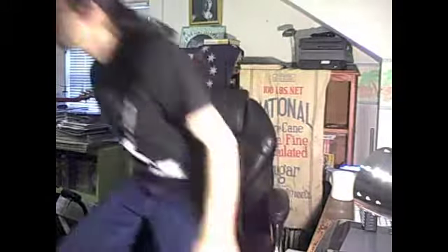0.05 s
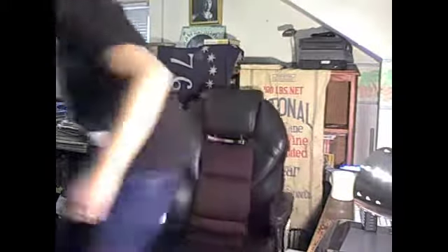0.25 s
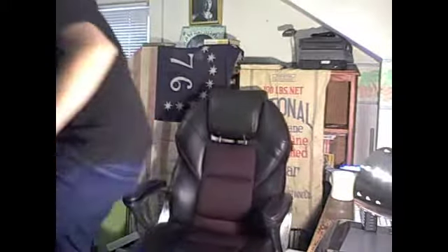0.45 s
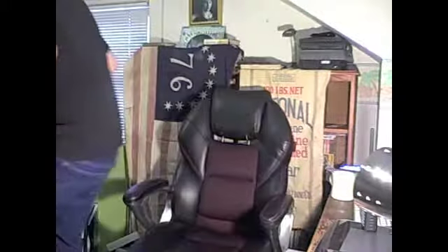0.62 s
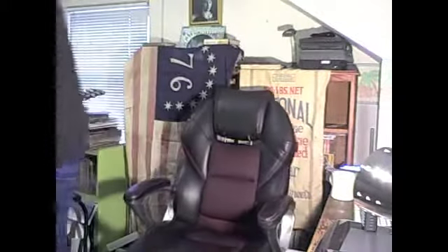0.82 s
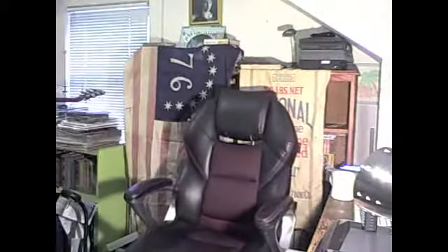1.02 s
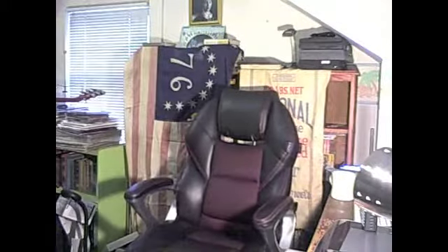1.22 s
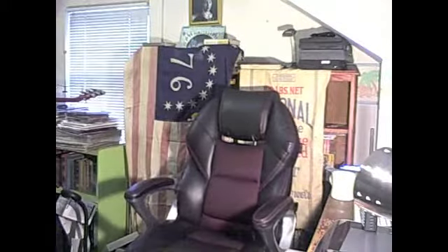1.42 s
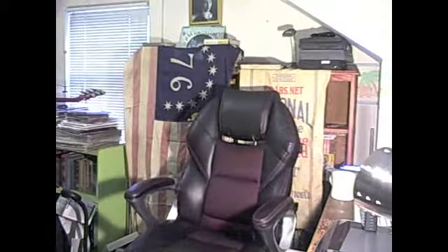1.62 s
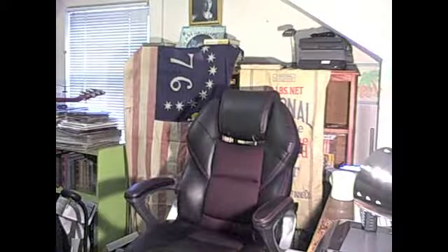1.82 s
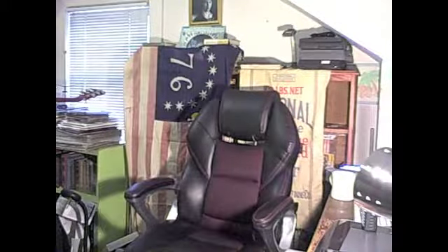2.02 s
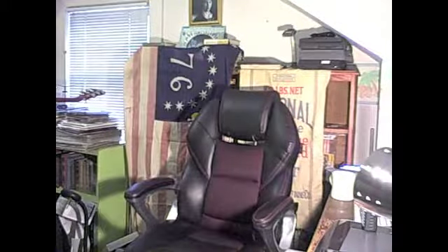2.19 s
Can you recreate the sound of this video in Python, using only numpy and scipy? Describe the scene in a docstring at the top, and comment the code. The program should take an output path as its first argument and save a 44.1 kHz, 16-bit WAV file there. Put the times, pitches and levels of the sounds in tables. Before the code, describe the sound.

Three heavy footsteps thump on a wooden floor as someone gets up from an office chair in a small room. Loose things rattle, and soles and clothes shuffle between steps. The nearby microphone shakes with a low rumble.

```python
"""Three heavy footsteps on a wooden floor, as someone gets up from an office chair in a small cluttered room.
Each heel impact excites the damped modes of the boards. The weight sets the floor and desk swaying,
which rattles loose things and overloads the microphone. Between the steps, soles and clothes make
friction noise, the chair knocks lightly and wood creaks, over a quiet hiss and a faint electrical whine."""
import sys
import numpy as np
from scipy import signal
from scipy.fft import rfft, irfft
from scipy.io import wavfile

SR = 44100
rng = np.random.default_rng(int(sys.argv[2]) if len(sys.argv) > 2 else 0)


def output_pcm(signal):
    """Save a mono or channel-first signal as 16-bit PCM at the path in sys.argv[1].

    Samples are clipped to [-1, 1] before scaling.
    """
    pcm = np.clip(np.atleast_2d(signal).T, -1, 1) * 32767
    wavfile.write(sys.argv[1], SR, np.round(pcm).astype(np.int16))


N = 103635
T = np.arange(N) / SR
HZ = np.maximum(np.arange(N // 2 + 1) * SR / N, 1)

# heel impacts: start_s, level_db, contact_cutoff_hz
HEEL_IMPACTS = [(0.2293, -10, 1310), (0.2354, -13.5, 705), (0.2446, -7, 707), (.9895, -5, 600),
                (.9962, -6, 550), (1.201, -22.5, 490), (1.8698, -7.5, 1080), (1.8768, -6.5, 880),
                (1.891, -12, 1300), (1.921, -15, 604)]
# floorboard modes: pitch_hz, level_db, t60_s
BOARD_MODES = [(88, -22, 0.38), (112.3, -12.5, 0.049), (140.1, -3.5, 0.091), (178.8, -4.5, 0.093),
               (211.7, -7.5, 0.13), (269.6, -22, 0.16), (324.2, -9.5, 0.086), (360.2, -18, 0.31),
               (463.7, -33, 0.11), (504.7, -13, 0.054), (566.3, -30, 0.093), (698, -23.5, 0.22),
               (1034, -27.5, 0.14), (1430, -22, 0.17)]
# spectrum of the sole's slap: frequency_hz, level_db
SLAP_SPECTRUM = [(100, -3.5), (250, -1), (450, 3.5), (800, -6.5), (1250, -14.5), (1600, -8), (2000, -25.5),
                 (2900, -37.5), (3900, -9.5), (4800, -49), (8000, -48.5)]
def heels(slap_db=-24, slap_decay_s=0.031, slap_cutoff_ratio=2.9):
    """Impact excitation: a blow rings the boards and slaps the sole; soft contact limits the treble."""
    out = 0
    for start, db, contact_hz in HEEL_IMPACTS:
        boards = sum(undb(mode_db) * ring(start, hz, t60) for hz, mode_db, t60 in BOARD_MODES)
        thump = lowpass(boards, contact_hz, order=3)
        slap = burst(start, slap_decay_s) * rng.standard_normal(N)
        slap = undb(slap_db) * irfft(rfft(slap) * unit(colour(SLAP_SPECTRUM)), N)
        out += undb(db) * (thump + lowpass(slap, slap_cutoff_ratio * contact_hz))
    return out


# weight landing on the joists: start_s, level_db
JOIST_LOADS = [(0.252, -0.5), (0.997, -6.5), (1.887, -1)]
# desk rocking as the weight shifts: centre_s, level_db, centre_pitch_hz, half_length_s
DESK_ROCKINGS = [(0.278, 5, 21.15, 0.0284), (0.632, -14, 19.8, 0.044), (1.923, 0.5, 16.5, 0.0291),
                 (2.091, -19.5, 22.5, 0.039)]
# desk shudders after a footfall or shove: start_s, level_db, pitch_hz, t60_s
DESK_SHUDDERS = [(0.26, -10, 60.5, 0.47), (0.26, -17, 83.8, 0.29), (1.006, -21.5, 61.7, 0.31),
                 (1.205, -23, 93.8, 0.36), (1.288, -26.5, 178, 0.11), (1.504, -35, 134, 0.35),
                 (1.924, -10.5, 58.6, 0.34), (1.94, -14.5, 89, .2)]
# spectrum of a steady low tremble: frequency_hz, level_db
TREMBLE_SPECTRUM = [(5, -22), (12, -3), (18, -10), (28, -17), (50, -25), (100, -51), (300, -100)]
def floor_and_desk(sway_hz=12.08, sway_t60_s=0.95, rise_s=0.044, sag_hz_per_s=194, tremble_db=-31.5):
    """Structure-borne vibration: loaded joists dip and sway; the desk shakes the microphone on it."""
    out = undb(tremble_db) * noise(colour(TREMBLE_SPECTRUM))
    for start, db in JOIST_LOADS:
        onset = 1 - burst(start, rise_s)
        out -= undb(db) * onset * ring(start, sway_hz, sway_t60_s)
    for centre, db, hz, half_length in DESK_ROCKINGS:
        age = T - centre
        slowing_phase = 2 * np.pi * age * (hz - sag_hz_per_s * age / 2)
        out += undb(db) * gaussian(centre, half_length) * np.sin(slowing_phase)
    shudders = sum(undb(db) * ring(start, hz, t60) for start, db, hz, t60 in DESK_SHUDDERS)
    return lowpass(out - shudders, hz=250)


# knocks of the chair and loose things: start_s, level_db, decay_s, cutoff_hz, ring_hz, ring_db
KNOCKS = [(0.1981, -28, 0.021, 4200, 777, 8.5), (.2455, -17.5, 0.018, 3380, 1050, 4.5),
          (.2475, -9.5, 0.0025, 2920, 1505, 2.5), (0.2536, -8, 0.002, 3000, 2265, -11.5),
          (.281, -44, .008, 2950, 1670, 5), (.298, -43, .015, 3600, 580, 22.5),
          (1.270, -32, 0.018, 8400, 1466, 3), (1.345, -28.5, 0.0076, 2376, 370, -1.5),
          (1.762, -43.5, 0.011, 4000, 1030, 5), (1.892, -17.5, 0.015, 2080, 767, 3),
          (1.9004, -14, 0.0055, 3560, 319.5, 4.5), (1.919, -21, 0.0075, 4530, 3800, -22),
          (1.942, -31, 0.025, 5500, 3930, -7)]
# their broad spectrum: frequency_hz, level_db
KNOCK_SPECTRUM = [(150, -3.5), (350, 8.5), (750, 4), (1250, -11), (1900, -11), (2500, -9.5), (3200, -11.5),
                  (4000, -7), (4800, -15.5), (8000, -21.5)]
# their shared resonances: centre_hz, width_hz, boost_db
KNOCK_RESONANCES = [(820, 210, 1.3), (1035, 27, 16.3), (1423, 350, 9.2), (1624, 130, 19)]
def knocks(ring_t60_s=0.036):
    """Resonance: rattling contacts drive a shared body, and each object rings briefly at its own pitch."""
    peaks_db = sum(resonance_db(hz, width, db) for hz, width, db in KNOCK_RESONANCES)
    body = colour(KNOCK_SPECTRUM) * undb(peaks_db)
    out = 0
    for start, db, decay, cutoff_hz, ring_hz, ring_db in KNOCKS:
        rattle = lowpass(burst(start, decay) * noise(body), cutoff_hz)
        own_ring = undb(ring_db) * ring(start, ring_hz, ring_t60_s)
        out += undb(db) * (rattle + own_ring)
    return out


# strokes of soles and cloth: peak_s, level_db, rise_s, fall_s, tilt_db_per_octave, resonance_hz, boost_db
SCUFFS = [(.08, -41.5, 0.36, 0.24, -3, 187, 7), (.42, -40.5, .05, 0.054, -6, 515, 12),
          (1.114, -46.5, 0.048, 0.036, 3, 1470, 13), (1.208, -30, 0.025, .028, -3.5, 300, 7.5),
          (1.371, -34.5, 0.041, 0.026, -2.5, 810, 9), (1.409, -32, 0.025, 0.019, -1, 1500, 15),
          (1.504, -39.5, 0.0078, 0.07, -4.5, 898, 11), (1.66, -53.5, 0.18, 0.12, 0, 258, 3.5),
          (2.044, -47, .015, 0.019, 1.5, 6030, 4), (2.34, -47, 0.14, .1, -3, 126, 19.5)]
# friction spectrum: frequency_hz, level_db
FRICTION_SPECTRUM = [(80, -13.5), (200, 0), (350, -4), (520, -6), (830, -0.5), (1220, -4.5), (1550, -3),
                     (1900, -11.5), (2700, -16.5), (3900, -8.5), (4800, -17), (8000, -25)]
def scuffs(grain_db=1.0, grain_hz=150, resonance_q=7.4):
    """Sliding friction: grainy noise swells and fades, each stroke exciting one resonance."""
    out = 0
    for peak, db, rise, fall, tilt_db, hz, boost_db in SCUFFS:
        swell = np.exp(-np.abs(T - peak) / np.where(T < peak, rise, fall))
        grain = unit(undb(grain_db * noise(HZ < grain_hz)))
        slope_db = tilt_db * np.log2(np.maximum(HZ, 100))
        peak_db = resonance_db(hz, hz / resonance_q, boost_db)
        friction = noise(colour(FRICTION_SPECTRUM) * undb(slope_db + peak_db))
        out += undb(db) * swell * grain * friction
    return out


# hollow creaks: centre_s, level_db, pitch_hz
CREAKS = [(.37, -29.5, 363), (1.461, -37, 362.4), (2.087, -31.5, 344.8)]
def creaks(half_length_s=0.0067):
    """Resonance of wood under strain: each creak is a brief pulse of one tone."""
    return sum(undb(db) * gaussian(centre, half_length_s) * np.sin(2 * np.pi * hz * T)
               for centre, db, hz in CREAKS)


# reverberation bands: centre_hz, t60_s, level_db
ROOM_BANDS = [(103, 0.67, -5.5), (310, 0.5, -3.5), (743, 0.61, -1.5), (2000, 0.27, 3), (6040, 0.38, 3)]
def room(sound, tail_db=-8, gap_s=0.0045):
    """Reverberation: diffuse reflections decay exponentially in each band, absorbed by the clutter."""
    log_centres = np.log([hz for hz, _, _ in ROOM_BANDS])
    white_spectrum = rfft(rng.standard_normal(N))
    tail = 0
    for share, (_, t60, db) in zip(np.eye(len(ROOM_BANDS)), ROOM_BANDS):
        band = irfft(white_spectrum * np.interp(np.log(HZ), log_centres, share), N)
        tail += undb(db) * band * burst(gap_s, t60 / np.log(1000))
    return sound + undb(tail_db) * signal.fftconvolve(sound, tail / np.linalg.norm(tail))[:N]


# hiss spectrum: frequency_hz, level_db
HISS_SPECTRUM = [(60, -24), (100, -17), (150, -27), (350, -34.5), (600, -34.5), (1100, -41.5), (1600, -43),
                 (2100, -47), (2700, -50.5), (3900, -48.5), (4800, -51.5), (8400, -51.5)]
def background(hiss_db=-49.5, whine_db=-76.5, whine_hz=7682):
    """Stationary noise floor: broadband hiss and the pure tone of an electrical whine."""
    hiss = undb(hiss_db) * noise(colour(HISS_SPECTRUM) * (HZ > 40))
    return hiss + undb(whine_db) * np.sin(2 * np.pi * whine_hz * T)


def undb(db):
    """Decibels to amplitude gain."""
    return 10 ** (np.asarray(db) / 20)


def unit(x):
    """Normalisation to rms 1."""
    return x / np.sqrt(np.mean(x ** 2))


def colour(points):
    """Spectral envelope: gain at every frequency from (frequency_hz, level_db) points."""
    hz, db = np.array(points, float).T
    return undb(np.interp(np.log(HZ), np.log(hz), db))


def resonance_db(hz, width_hz, boost_db):
    """Bell-shaped spectral peak, in decibels."""
    return boost_db / (1 + (2 * (HZ - hz) / width_hz) ** 2)


def noise(gain):
    """Random-phase noise of rms 1 with the given spectrum."""
    return unit(irfft(gain * np.exp(2j * np.pi * rng.random(len(HZ))), N))


def lowpass(x, hz, order=2):
    """Treble roll-off, as from a soft contact."""
    return signal.sosfilt(signal.butter(order, hz, fs=SR, output="sos"), x)


def ring(start, hz, t60):
    """Free vibration of a damped mode."""
    age = np.maximum(T - start, 0)
    return np.sin(2 * np.pi * hz * age) * np.exp(-np.log(1000) * age / t60)


def burst(start, decay):
    """Sudden onset, exponential decay."""
    return (T >= start) * np.exp(-np.abs(T - start) / decay) + 1e-12


def gaussian(centre, half_length):
    """Smooth pulse envelope."""
    return np.exp(-((T - centre) / half_length) ** 2)


def scene():
    """Superposition: airborne sound with its reverberation, structure-borne sway and the noise floor."""
    airborne = heels() + knocks() + scuffs() + creaks()
    return (room(airborne) + floor_and_desk() + background())[None]


def record(dry, mic_top_hz=8450, clip_level=0.95, circuit_db=-91, output_top_hz=15800):
    """Saturation: a band-limited microphone clips on the deepest swings and adds faint circuit noise."""
    narrow = signal.sosfilt(signal.ellip(10, .2, 60, mic_top_hz, fs=SR, output="sos"), dry)
    clipped = np.clip(narrow, -clip_level, clip_level) + undb(circuit_db) * rng.standard_normal(N)
    return signal.sosfilt(signal.ellip(8, .2, 70, output_top_hz, fs=SR, output="sos"), clipped)


dry = scene()
out = record(dry)
output_pcm(out)
```